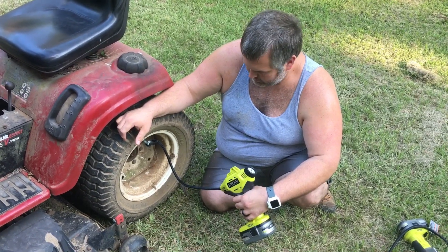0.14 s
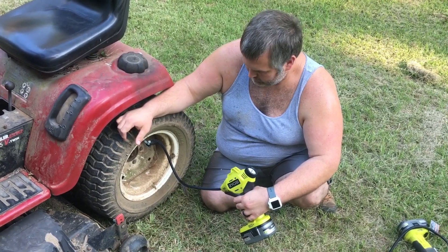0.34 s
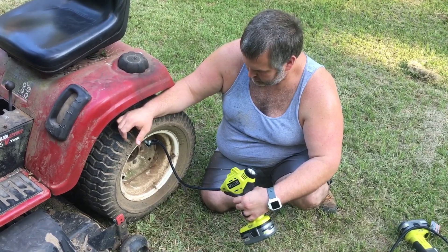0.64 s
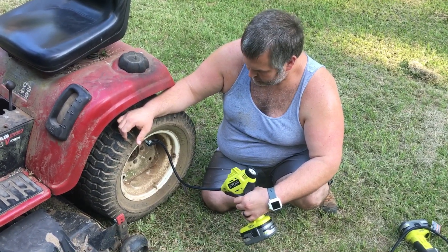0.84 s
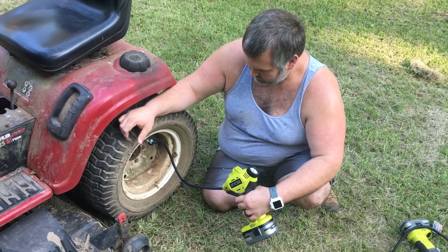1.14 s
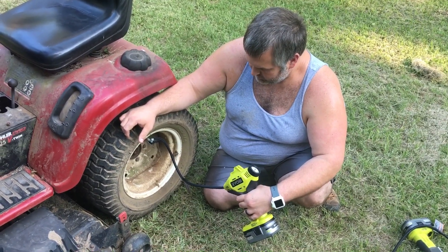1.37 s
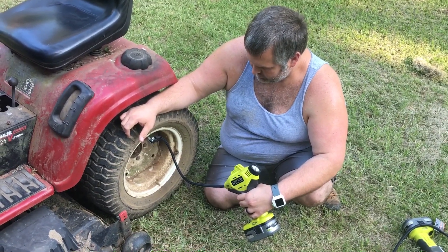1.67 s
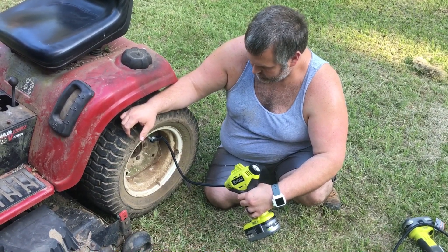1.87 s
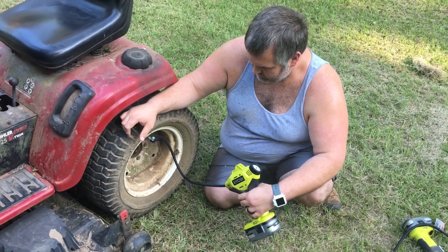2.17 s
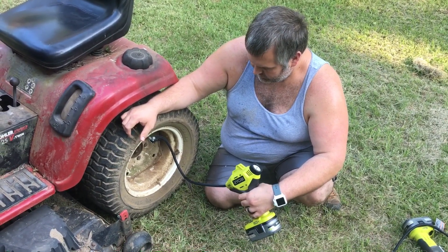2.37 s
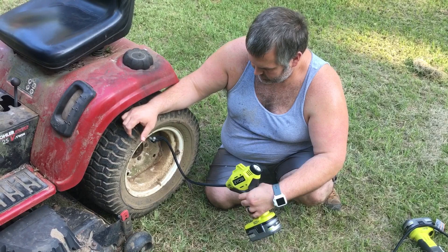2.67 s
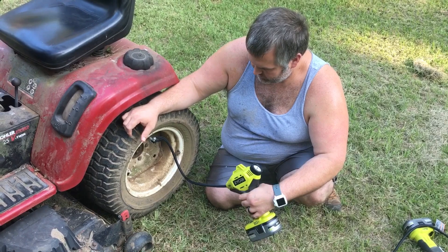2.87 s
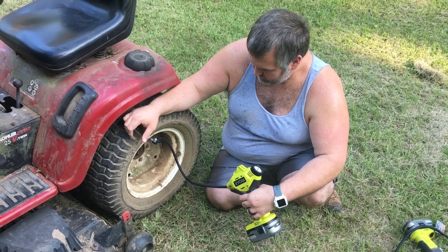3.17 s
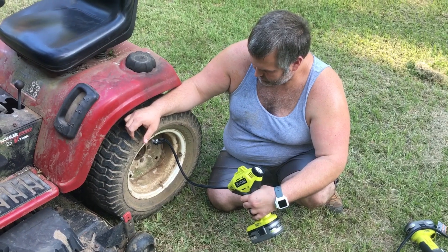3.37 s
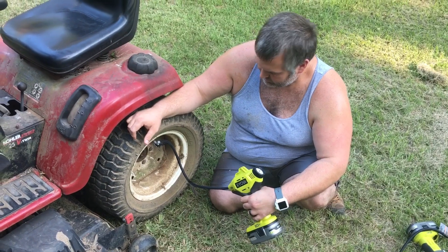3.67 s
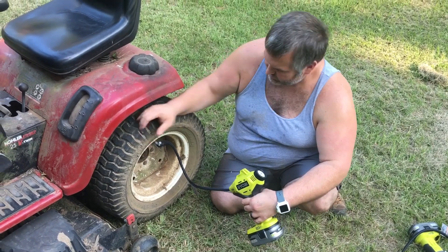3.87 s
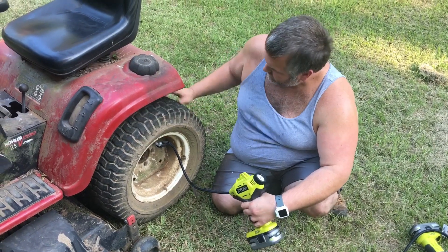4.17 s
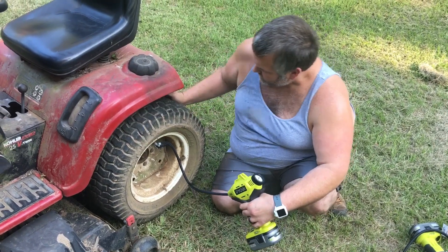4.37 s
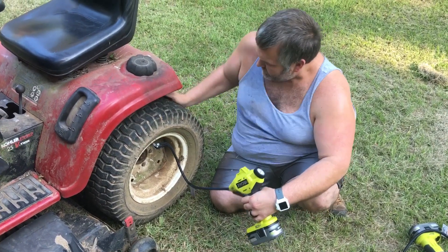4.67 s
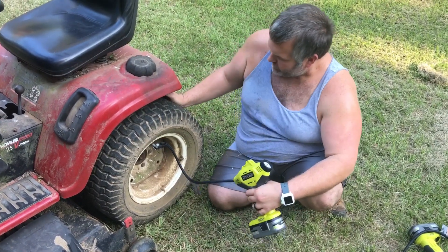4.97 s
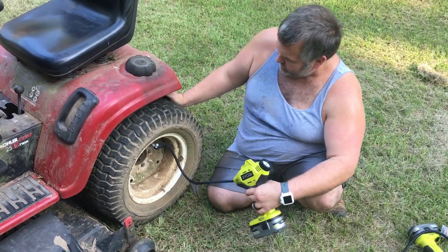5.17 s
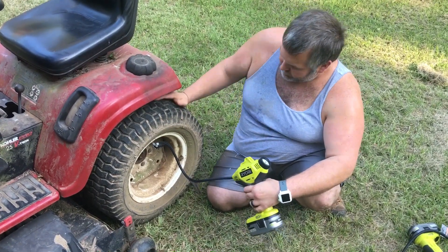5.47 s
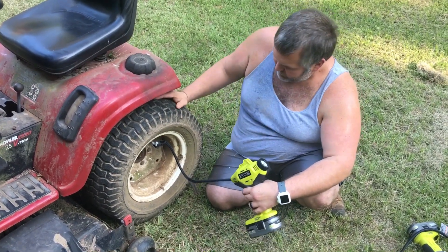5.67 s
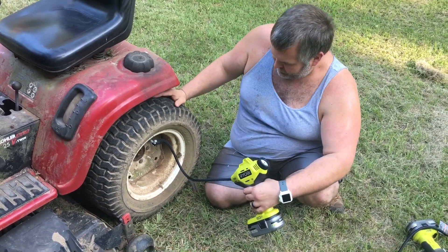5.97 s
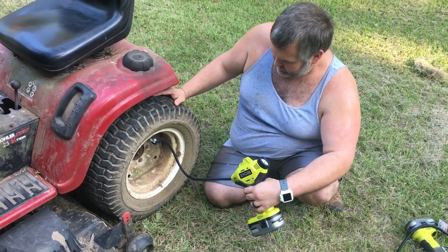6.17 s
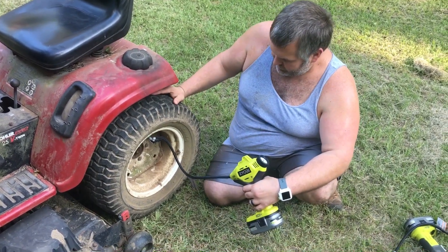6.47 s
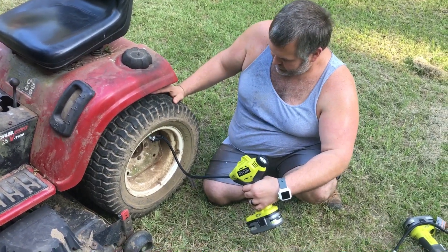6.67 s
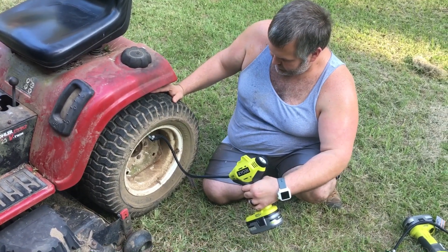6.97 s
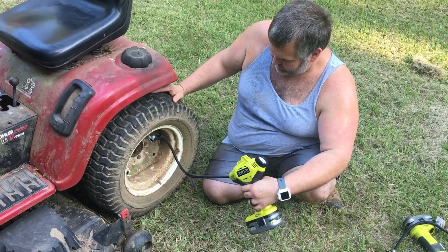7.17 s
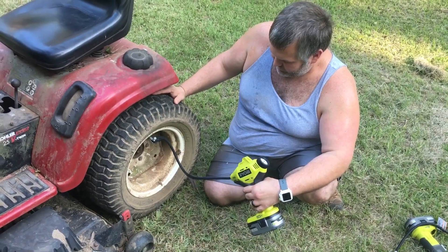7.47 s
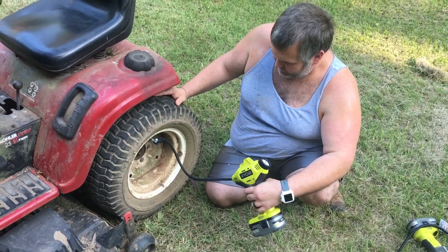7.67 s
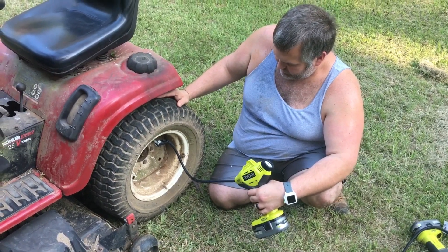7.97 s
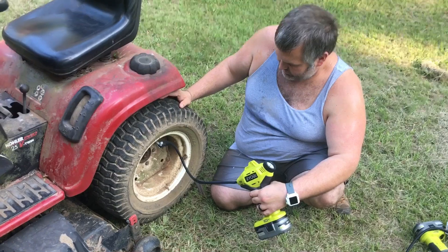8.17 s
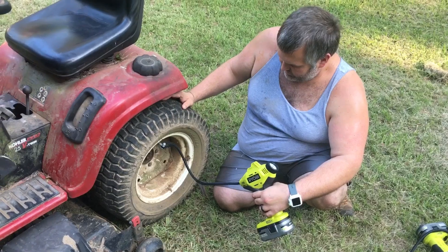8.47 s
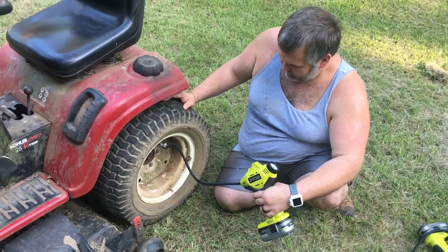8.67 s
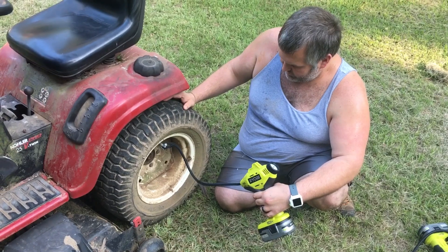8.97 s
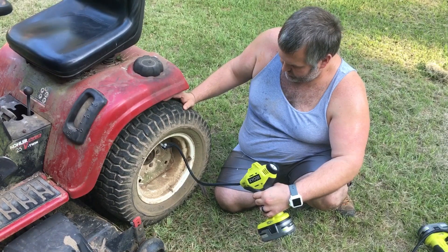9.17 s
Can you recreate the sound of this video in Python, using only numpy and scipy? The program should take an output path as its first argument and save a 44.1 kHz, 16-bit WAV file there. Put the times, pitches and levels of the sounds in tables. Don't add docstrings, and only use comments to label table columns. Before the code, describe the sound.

A cordless inflator runs without pause beside a tractor tyre on grass. Its fast piston makes a hard, raspy buzz with plastic shell rattle, gear whine and airy hiss over a low throb. Around the middle the tool turns in the hand and the timbre shifts, slightly nearer and differently bright. Light wind bumps the phone microphone about two metres away; a distant engine faintly slows down.

```python
import sys
import numpy as np
from scipy import signal
from scipy.fft import rfft, irfft
from scipy.io import wavfile
from scipy.ndimage import map_coordinates

SR = 44100
rng = np.random.default_rng(int(sys.argv[2]) if len(sys.argv) > 2 else 0)


def dump(signal):
    limited = np.clip(np.atleast_2d(signal).T, -1, 1)
    pcm = np.round(limited * 32767).astype(np.int16)
    wavfile.write(sys.argv[1], SR, pcm)


def convert_level_to_amplitude(level_db):
    exponent = np.asarray(level_db, float) / 20
    return 10 ** exponent


N = 411453
GEAR_TEETH, PINION_TEETH = 46, 10
WEAR_ABOVE_HZ = 3900


def level(x, db):
    return x * convert_level_to_amplitude(db) / np.sqrt(np.mean(x ** 2))


def ring(x, hz, width):
    return signal.lfilter(*signal.iirpeak(hz, hz / width, fs=SR), x)


def ring_twice(x, hz, width):
    return ring(ring(x, hz, width), hz, width)


def highpass(order, hz):
    return signal.butter(order, hz, "high", fs=SR, output="sos")


def walk(rate):
    steps = rng.standard_normal(int(N / SR * rate) + 2)
    return np.sqrt(3 / 2) * np.interp(np.arange(N) * rate / SR, np.arange(len(steps)), steps)


def swell(crank, angle, sharp):
    return (.5 + .5 * np.cos(2 * np.pi * (crank - angle))) ** sharp


def blows(crank, angle, late, size):
    at = np.interp(np.arange(len(size)) + angle + late, crank, np.arange(N), right=N - 2)
    whole = at.astype(int)
    out = np.zeros(N + 1)
    np.add.at(out, whole, size * (1 - at + whole))
    np.add.at(out, whole + 1, size * (at - whole))
    return out[:N]


def soft(click, hz):
    return signal.sosfilt(signal.butter(3, hz, fs=SR, output="sos"), click)


def blend(facing_db, turned_db, turned):
    return convert_level_to_amplitude(facing_db + turned * (turned_db - facing_db))


def wind():
    # frequency in Hz, density in dB per Hz.
    air_shape = [(20, -40), (28, -26), (42, -12), (55, -7), (100, -15), (200, -21.5), (350, -18.5),
                 (500, -21.5), (650, -23.5), (900, -5.5), (1500, -62)]
    # time in seconds, peak level in dB, brightness in dB.
    gusts = [(1.85, -46, -1), (2.63, -44, -9), (3.2, -50, -12), (4.37, -52, -10), (5.12, -49, -10),
             (5.69, -45, -12), (6.61, -44, -2), (7.27, -45, -12), (7.35, -46, -4), (7.7, -48, -12),
             (7.95, -50, -12), (8.23, -48, -3), (8.35, -48, -12), (8.61, -47, -12)]
    hz, db = np.transpose(air_shape)
    shape = convert_level_to_amplitude(np.interp(np.log(np.fft.rfftfreq(N, 1 / SR) + 1), np.log(hz), db, right=-80))
    rumble = level(irfft(rfft(rng.standard_normal(N)) * shape, N), -48.5) * convert_level_to_amplitude(1.7 * walk(9))
    s, dull, bright = np.arange(N) / SR, np.zeros(N), np.zeros(N)
    for at, peak_db, bright_db in gusts:
        puff = convert_level_to_amplitude(peak_db) * np.exp(-((s - at) / 0.013) ** 2)
        dull = dull + puff
        bright = bright + puff * convert_level_to_amplitude(bright_db)
    noise = rng.standard_normal((2, N))
    low_noise = level(ring_twice(noise[0], 75., 110.), 0)
    high_noise = level(ring_twice(noise[1], 280., 400.), 0)
    return rumble + dull * low_noise + bright * high_noise


def far_engine():
    # time in seconds, frequency in Hz, level in dB.
    slowing = [
        (3.6, 46, -75),
        (4.1, 42, -62),
        (4.8, 38, -59),
        (5.4, 32.8, -61),
        (5.9, 29, -70),
        (6.2, 27, -73),
    ]
    times, hz, db = np.transpose(slowing)
    s = np.arange(N) / SR
    phase = 2 * np.pi * np.cumsum(np.interp(s, times, hz)) / SR
    return convert_level_to_amplitude(np.interp(s, times, db) + 3.0 * walk(8)) * np.sin(phase)


def piston(crank, turned):
    # multiple of crank speed, level facing in dB, level turned in dB.
    stroke = [(1, -45, -45), (2, -45, -46), (3, -55, -56), (4, -68, -76), (5, -68, -71), (6, -46, -51),
              (7, -60, -56), (8, -63, -59), (9, -65, -71), (10, -56, -56), (11, -50, -51), (12, -52, -54),
              (13, -54, -56)]
    # offset from motor speed in crank multiples, level in dB.
    motor = [(-1, -75), (0, -58), (1, -72), (2, -65), (4, -68), (6, -62), (8, -58), (9, -67), (10, -65),
             (13, -60)]
    motor_ratio = GEAR_TEETH / PINION_TEETH
    throb = sum(blend(a, b, turned) * np.cos(2 * np.pi * k * (crank - .39)) for k, a, b in stroke)
    hum = sum(convert_level_to_amplitude(db) * np.cos(2 * np.pi * (motor_ratio + k) * crank) for k, db in motor)
    return np.sqrt(2) * (throb + hum)


def gears(crank, turned):
    # multiple of tooth rate, angle of most load in turns, level facing and turned in dB.
    mesh = [(2, 0.012, -43.5, -39)]
    spin = crank - .0016 * np.sin(2 * np.pi * (crank - .02))
    spin = spin + 0.00025 * walk(40)
    out = 0
    for k, angle, a, b in mesh:
        whine = swell(crank, angle, 2.9) * np.sin(2 * np.pi * k * GEAR_TEETH * spin)
        out = out + blend(a, b, turned) * level(whine, 0)
    return out


def rod(crank, turned):
    # frequency in Hz, width in Hz, crank angle in turns, level facing and turned in dB.
    knocked = [(3022, 120, 0.0318, -28.5, -48), (3190, 102, .88, -37.5, -32.5), (3348, 81, 0.79, -41, -60),
               (2900, 91, .3, -65, -40), (3178, 11, .5, -46.5, -64), (2660, 300, .9, -66, -54),
               (3577, 160, .3, -42.5, -45), (4144, 71, 0.26, -51, -46), (4800, 200, .44, -46, -60),
               (5080, 200, .4, -60, -60), (5550, 170, .4, -56, -62), (6400, 84, 0.29, -50, -53)]
    out = 0
    for hz, width, angle, a, b in knocked:
        late, size_db = rng.standard_normal((int(crank[-1]), 2)).T
        click = blows(crank, angle, .0006 * late, convert_level_to_amplitude(1.2 * size_db))
        through_frame = ring(click, hz, 1.7 * width)
        out = out + blend(a, b, turned) * level(ring(through_frame, hz, width), 0)
    return out


def worn(crank):
    steps, pattern_lasts_s = SR // 66, 1.476
    spots = rng.standard_normal((int(N / SR) * 2, steps))
    age = np.minimum(np.arange(N) / SR / pattern_lasts_s, len(spots) - 2)
    place = (crank % 1 * steps).astype(int)
    old = age.astype(int)
    fade = np.pi / 2 * (age - old)
    return spots[old, place] * np.cos(fade) + spots[old + 1, place] * np.sin(fade)


def rattle(crank, turned):
    # frequency in Hz,
    # width in Hz, crank angle in turns, swell in dB, level facing in dB, level turned in dB.
    shaken_modes = [(830, 250, 0.41, -6, -46.5, -47.5), (1050, 87, 0.67, -19, -49.5, -46.5),
                    (1375, 460, 0.11, -6.5, -35, -35), (1678, 255, 0.35, -7, -42.5, -38),
                    (2170, 1080, 0.52, -5, -36, -35), (2607, 440, 0.42, 34, -40.5, -42.5),
                    (2750, 280, 0.095, 7, -53, -31.5), (3136, 440, 0.3, -5, -35.5, -34.5),
                    (3640, 90, 0.22, 2.5, -38.5, -40), (4240, 770, 0.35, 9, -37, -39),
                    (4930, 720, 0.5, 13, -44.5, -55.5), (5320, 1100, 0.39, 1.5, -45.5, -44.5),
                    (6010, 1900, 0.023, 9, -41.5, -38.5), (6430, 190, 0.57, 29, -46.5, -45),
                    (7200, 1660, 0.29, 15, -43.5, -48), (8460, 840, 0.31, 6, -49, -45),
                 (9630, 470, 0.36, 10.5, -45.5, -47), (9640, 490, 0.94, 24, -47, -46),
                 (11470, 1800, 0.29, 5, -53.5, -54), (13960, 1700, 0.073, 6, -47.5, -47),
                 (15550, 1100, .06, 17, -47.5, -45)]
    worn_share = 0.15
    shudder_db = 0.58 * walk(120)
    wear = signal.sosfilt(highpass(6, WEAR_ABOVE_HZ), worn(crank))
    out = 0
    for hz, width, angle, swell_db, a, b in shaken_modes:
        puff_db = swell_db * swell(crank, angle, 2.2)
        share = worn_share * (hz > WEAR_ABOVE_HZ)
        grit = np.sqrt(share) * wear + np.sqrt(1 - share) * rng.standard_normal(N)
        grit = grit * convert_level_to_amplitude(puff_db + shudder_db + .5 * walk(30))
        out = out + blend(a, b, turned) * level(ring_twice(grit, hz, 1.27 * width), 0)
    return out


def valve(crank, turned):
    # frequency in Hz, width in Hz, level facing in dB, level turned in dB.
    slapped = [(1320, 290, -41, -36), (1020, 150, -38.5, -38.5), (1426, 170, -37.5, -45),
               (1570, 40, -85, -44), (1698, 103, -38, -36), (2200, 33, -91, -82), (2330, 57, -46, -42.5),
               (2592, 81, -29.5, -33.5)]
    late, size_db = rng.standard_normal((int(crank[-1]), 2)).T
    click = soft(blows(crank, .205, .0008 * late, convert_level_to_amplitude(1.1 * size_db)), 3800.)
    out = 0
    for hz, width, a, b in slapped:
        out = out + blend(a + 0.43 * walk(1.67), b, turned) * level(ring(click, hz, width), 0)
    return out


def glide(x, course, width_hz):
    times, hz, db = np.transpose(course)
    s = np.arange(N) / SR
    spin = np.exp(2j * np.pi * np.cumsum(np.interp(s, times, hz)) / SR)
    keep = np.exp(-np.pi * width_hz / SR)
    band = 2 * np.real(spin * signal.lfilter([1 - keep], [1, -keep], x / spin))
    return x + (convert_level_to_amplitude(np.interp(s, times, db)) - 1) * band


def shade(shell, turned):
    # time in seconds, frequency in Hz, gain in dB.
    palm = [
        (3.85, 4350, -7),
        (4.05, 4350, 2.5),
        (4.6, 4200, 2),
        (4.75, 4700, -6),
        (4.95, 5300, 10),
        (5.9, 5180, 8),
        (6.1, 5080, 7),
        (9.33, 5080, 6),
    ]
    # frequency in Hz, width in Hz, gain facing and turned in
    # dB.
    hollows = [(1359, 73, -1.7, -12), (2570, 185, 3.2, -8), (2624, 106, -7.5, -4.5), (3980, 170, -0.5, 0),
               (4360, 82, 5, -3), (4830, 210, -1.5, -8), (5400, 110, -10, -7), (8750, 250, 4, 0.1),
               (10460, 800, -2, -8.5), (12400, 900, -4, 0), (9200, 250, 1, 3.5), (15200, 400, 1, -3)]
    # time in seconds, lag in milliseconds.
    treble_bounce = [
        (0, 1.667),
        (3.8, 1.667),
        (4.0, 1.6),
        (4.7, 1.6),
        (4.9, 1.964),
        (5.8, 1.964),
        (6.1, 2.15),
        (9.33, 2.15),
    ]
    out = glide(shell, palm, 144)
    for hz, width, a, b in hollows:
        out = out + (blend(a, b, turned) - 1) * ring(out, hz, width)
    treble = signal.sosfiltfilt(highpass(2, 11500), out)
    lag = np.interp(np.arange(N) / SR, *np.transpose(treble_bounce)) * SR / 1000
    return out + convert_level_to_amplitude(-8.5) * map_coordinates(treble, [np.arange(N) - lag], mode="nearest")


def scene():
    # time in seconds, speed in turns per second.
    crank_speed = [(0.0, 65.965), (0.62, 66.016), (1.24, 66.103), (1.87, 66.137), (2.49, 66.156),
                   (3.11, 66.098), (3.73, 66.04), (4.35, 66.016), (4.98, 66.017), (5.6, 65.97),
                   (6.22, 66.162), (6.84, 65.985), (7.46, 65.819), (8.09, 65.813), (8.71, 65.852),
                   (9.33, 65.538)]
    # time in seconds, turned from 0 (facing) to 1.
    pose = [
        (0, 0),
        (3.8, 0.06),
        (4.3, 0.06),
        (4.7, 0.02),
        (4.95, 0.7),
        (5.6, 0.68),
        (6.3, 0.9),
        (9.33, 1),
    ]
    s = np.arange(N) / SR
    crank = np.cumsum(np.interp(s, *np.transpose(crank_speed))) / SR
    turned = np.clip(np.interp(s, *np.transpose(pose)), 0, 1)
    near_db, bounce_ms = 0.65 * turned, 1.534 + 0.23 * turned
    small = highpass(6, 890)
    slap = signal.sosfilt(small, valve(crank, turned))
    rest = signal.sosfilt(small, rod(crank, turned)) + rattle(crank, turned) + gears(crank, turned)
    downward = .75 * slap + 0.069 * rest
    downward = soft(downward, 2160.0)
    bounce = np.interp(s - bounce_ms / 1000, s, downward)
    shell = shade(slap + rest + bounce, turned) * convert_level_to_amplitude(near_db - 0.86)
    lean = np.clip((s - 4.1) / 0.28, 0, 1)
    return (shell + piston(crank, lean) + wind() + far_engine())[None]


def band_limit(x):
    return signal.sosfilt(signal.butter(12, 16860, fs=SR, output="sos"), x)


def record(dry):
    port = dry - 0.24 * ring(dry, 9500.0, 600.0)
    port = signal.sosfilt(signal.ellip(16, .3, 90, 15760, fs=SR, output="sos"), port)
    return band_limit(port)


dry = scene()
out = record(dry)
dump(out)
```